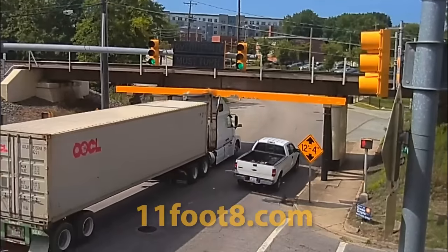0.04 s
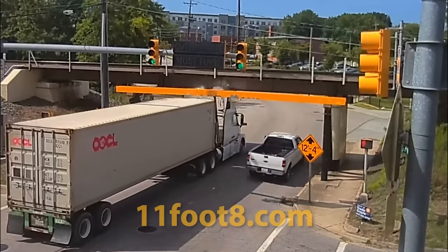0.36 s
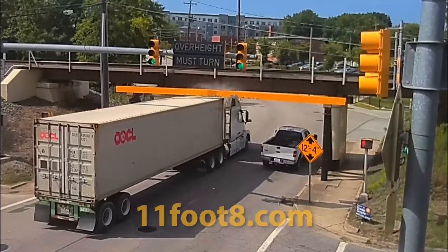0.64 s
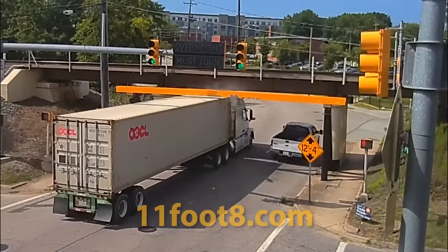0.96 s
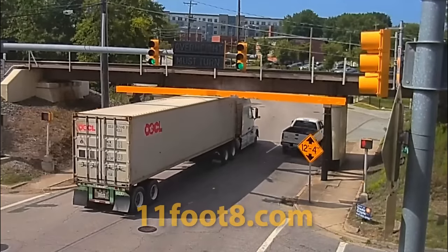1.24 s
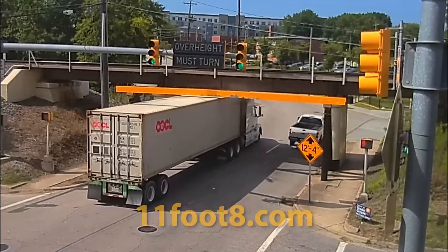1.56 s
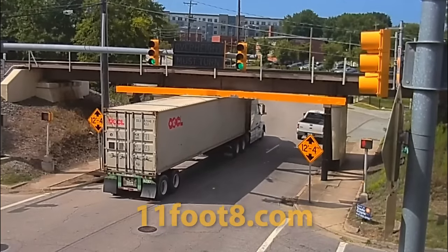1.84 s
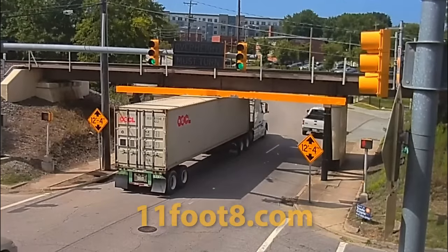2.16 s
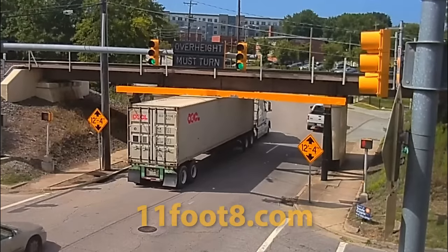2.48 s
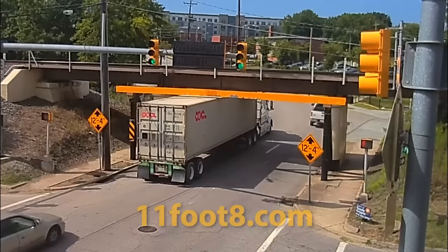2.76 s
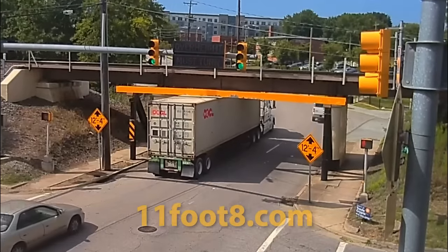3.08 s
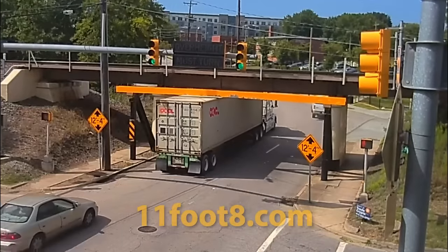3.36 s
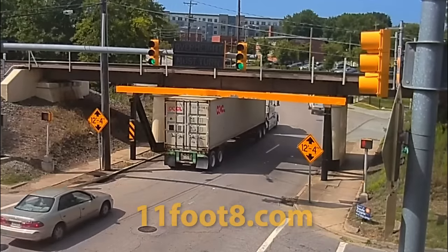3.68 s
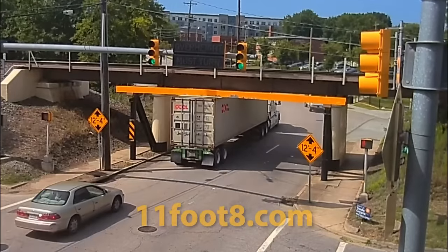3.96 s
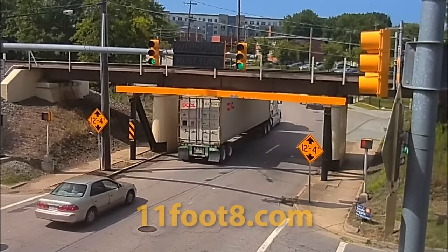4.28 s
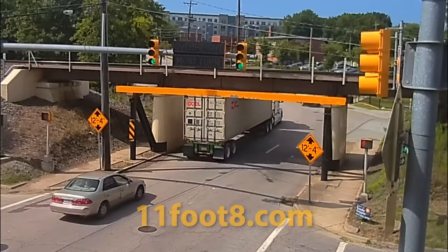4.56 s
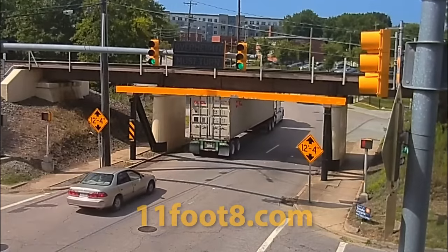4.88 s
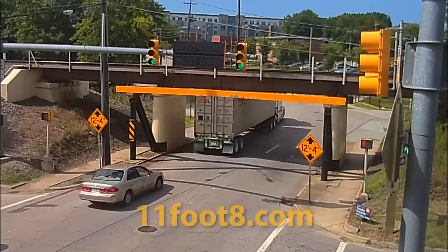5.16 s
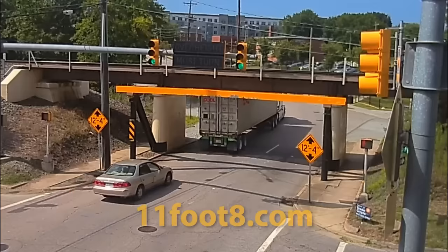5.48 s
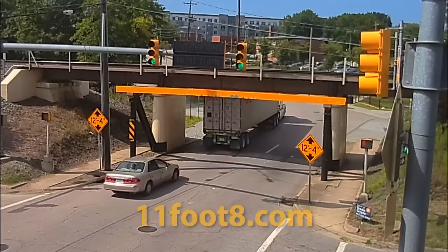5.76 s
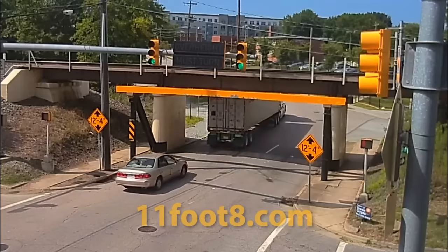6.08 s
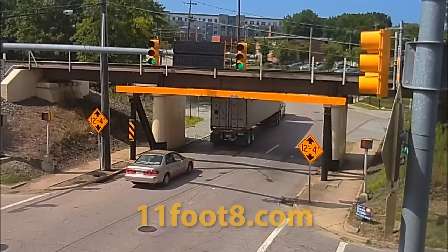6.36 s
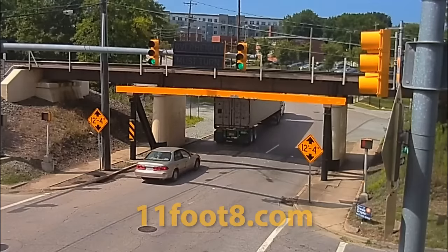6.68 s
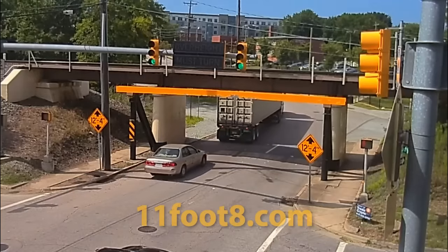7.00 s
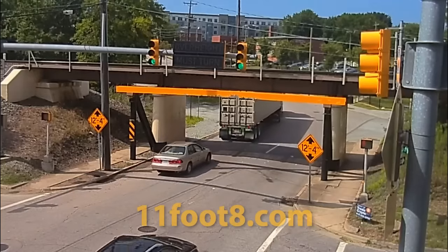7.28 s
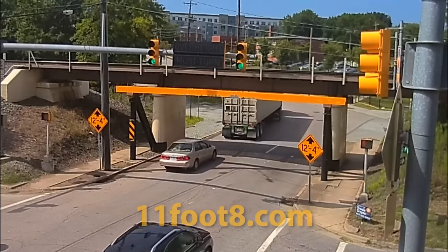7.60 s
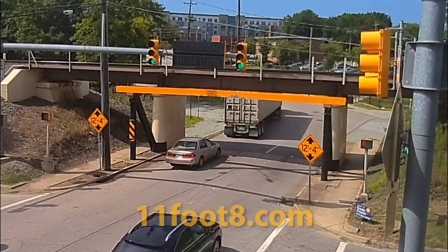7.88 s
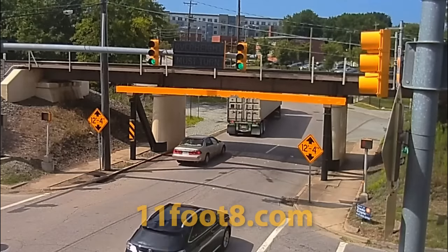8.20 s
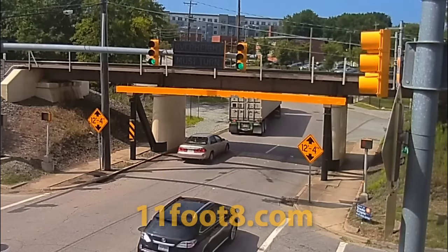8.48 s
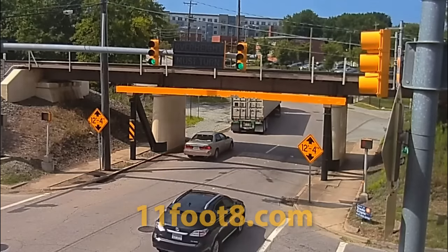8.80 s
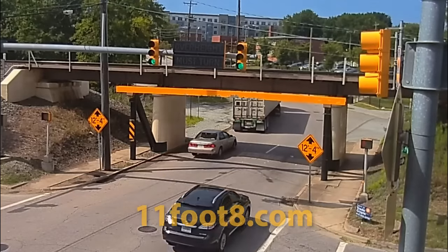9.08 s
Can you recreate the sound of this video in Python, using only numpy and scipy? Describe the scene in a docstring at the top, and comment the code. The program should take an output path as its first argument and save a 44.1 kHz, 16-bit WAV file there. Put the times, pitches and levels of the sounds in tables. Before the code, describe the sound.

Right from the start, a truck's container roof grinds loudly under a steel bridge beam. A harsh, juddering rasp and a hollow boom are strongest in the first half second, with a wavering squeal through the first second. The roof catches again several times between 1 and 2 seconds, with brief shrieks, distorting the small roadside microphone. The scrape then rings away into much quieter traffic: low engine drones and tyre rumble that slowly recede. Loose steel on the trailer clanks and rattles from about 2.2 to 3.2 seconds. A sharper clank comes at 4.7 seconds, a lighter one just after 5, and more rattling around 6 to 6.5 as a car engine swells softly. A bird chirps faintly between 7 and 7.7 seconds and again near 8.7. One small clank sounds at about 9 seconds over the continuing traffic.

```python
"""Lorry scraping under a low bridge

A container roof grinds under a steel guard beam for two seconds: stick-slip friction makes the steel
rasp, squeal and shriek and the hollow box boom, overloading a small roadside camera. The lorry drives
on: engines drone, tyres roll, loose steel on the trailer rattles and clanks, and a bird chirps."""
import sys
import numpy as np
from scipy import signal
from scipy.fft import rfft, irfft, next_fast_len
from scipy.io import wavfile
from scipy.ndimage import uniform_filter1d

SR = 44100
rng = np.random.default_rng(int(sys.argv[2]) if len(sys.argv) > 2 else 0)


def output_pcm(signal):
    """Save a mono or channel-first signal as 16-bit PCM at the path in sys.argv[1].

    Samples are clipped to [-1, 1] before scaling.
    """
    pcm = np.clip(np.atleast_2d(signal).T, -1, 1) * 32767
    wavfile.write(sys.argv[1], SR, np.round(pcm).astype(np.int16))


N = 407484
TIME = np.arange(N) / SR


def undb(db):
    """Decibels to amplitude ratio."""
    return 10 ** (np.asarray(db) / 20)


def unit(x):
    """Normalisation to rms 1."""
    return x / np.sqrt(np.mean(x ** 2))


def decay(t, t60):
    """Exponential damping: 60 dB down after t60 seconds."""
    return np.exp(-np.log(1000) * t / t60)


def colour(x, spectrum, modes=()):
    """Source-filter shaping: a smooth spectral envelope times a set of second-order resonances."""
    size = next_fast_len(len(x) + 8192)
    f = np.maximum(np.fft.rfftfreq(size, 1 / SR), 1)
    hz, db = np.transpose(spectrum)
    envelope = undb(np.interp(np.log(f), np.log(hz), db))
    resonance = 1 + sum(undb(peak_db) / (1 + 1j * (f * f - centre * centre) / (f * width))
                        for centre, width, peak_db in modes)
    return irfft(rfft(x, size) * resonance * envelope, size)[:len(x)]


def noise(spectrum):
    """Filtered Gaussian noise of rms 1."""
    return unit(colour(rng.standard_normal(N), spectrum))


def wander(rate):
    """Smooth random modulation of rms 1, through `rate` new values a second."""
    knots = rng.standard_normal(N // 20)
    path = np.interp(TIME * rate, np.arange(len(knots)), knots)
    return unit(uniform_filter1d(path, max(int(SR / rate / 2), 1)))


def impulses(per_s, spread_db):
    """Shot noise: dense tiny impacts, a few much larger than the rest."""
    size = undb(spread_db * np.minimum(rng.exponential(size=N), 5))
    return (rng.random(N) < per_s / SR) * size * rng.choice([-1, 1], N)


def glides(notes, jitter):
    """Frequency modulation: short tones, each wavering about a parabola through three pitches."""
    out = np.zeros(N)
    waver = 1 + jitter * wander(300)
    for start, length, first, middle, last, db in notes:
        at = np.flatnonzero((TIME >= start) & (TIME < start + length))
        progress = (TIME[at] - start) / length
        hz = np.polyval(np.polyfit([0, .5, 1], [first, middle, last], 2), progress) * waver[at]
        phase = 2 * np.pi * np.cumsum(hz) / SR
        out[at] += undb(db) * np.sqrt(2) * np.sin(np.pi * progress) * np.sin(phase)
    return out


def pushes(rows, release_t60, ring_db, ring_t60):
    """Envelope of forced vibration: each push rises, holds, then decays at two rates; powers add."""
    power, ring = np.zeros(N), undb(ring_db)
    for start, attack, hold, db in rows:
        rise = np.clip((TIME - start) / attack, 0, 1)
        after = np.maximum(TIME - start - attack - hold, 0)
        release = (1 - ring) * decay(after, release_t60) + ring * decay(after, ring_t60)
        power += (undb(db) * rise * release) ** 2
    return np.sqrt(power)


def underpass(x, wet_db, t60=0.54):
    """Reverberation: piers and deck add a short diffuse tail to the direct sound."""
    t = TIME[:SR]
    tail = rng.standard_normal(SR) * decay(t, t60) * (t > .012)
    return x + undb(wet_db) * signal.fftconvolve(x, tail / np.sqrt(np.sum(tail ** 2)))[:N]


def receding(db, fade_db_per_s, swell_db, leaves_s=2.18, under_deck_s=6.6, width_s=1.5):
    """Spreading loss and reflection: the gain falls as traffic draws away and swells under the deck."""
    under_deck = np.exp(-.5 * ((TIME - under_deck_s) / width_s) ** 2)
    return undb(db - fade_db_per_s * np.maximum(TIME - leaves_s, 0) + swell_db * under_deck)


def street():
    """Broadband rolling noise: heavy wheels rumble, treads roar, and grit hisses above them."""
    # spectra of wheels, treads and grit: (frequency [Hz], relative spectral level [dB])
    wheel_spectrum = [(10, -9.5), (22, 1.5), (32, 1.5), (44, -1), (60, -2.5), (80, -6), (105, -6.5),
                      (135, -11.5), (165, -16.5), (205, -14), (260, -22), (600, -38), (3000, -87)]
    tread_spectrum = [(100, -25), (250, -11), (320, 3.5), (390, 1), (470, 2.5), (600, 1.5), (800, -2.5),
                      (990, 3), (1200, -4), (1450, -5.5), (1800, -23.5), (3000, -32), (6000, -39)]
    grit_spectrum = [(500, -5.5), (1400, -0.5), (2200, -1.5), (3300, 0), (4000, 1), (4700, 2), (5500, 3.5),
                     (8000, -34)]
    rumble = noise(wheel_spectrum) * receding(-31.5, fade_db_per_s=0.46, swell_db=0.5)
    treads = noise(tread_spectrum) * receding(-44, fade_db_per_s=0.74, swell_db=0.52)
    treads *= undb(0.52 * wander(9))
    grit = unit(colour(impulses(per_s=14000, spread_db=1.5), grit_spectrum))
    grit *= receding(-43, fade_db_per_s=0.93, swell_db=3.24) * undb(0.55 * wander(18))
    return rumble + treads + grit


def exhaust(course, octave_db, throb_db, fade_s=0.36):
    """Periodic firing, muffled to its fundamental and octave; throb_db makes the level uneven."""
    times, rates, levels = np.transpose(course)
    hz = np.interp(TIME, times, rates) * (1 + .004 * wander(20))
    phase = 2 * np.pi * np.cumsum(hz) / SR
    tone = unit(np.sin(phase) + undb(octave_db) * np.sin(2 * phase))
    fade = np.clip(1 + np.minimum(TIME - times[0], times[-1] - TIME) / fade_s, 0, 1)
    return tone * fade * undb(np.interp(TIME, times, levels) + throb_db * wander(14))


def engines():
    """Superposition of exhaust tones from the lorry and the cars around it."""
    # the course of each engine: (time [s], firing rate [Hz], level [dB])
    lorry = [(0, 103.4, -23), (.9, 108, -30.5), (1.5, 114.1, -46), (2.5, 120.5, -39), (2.8, 128.5, -35),
             (3.7, 127.3, -41), (4.45, 124.6, -38.5), (5.5, 133.1, -51), (8.1, 133.5, -46.5),
             (8.7, 135.7, -45.5), (9.24, 134.3, -47.5)]
    car = [(2.4, 87.1, -41), (2.9, 93.7, -35.5), (4.4, 90.1, -49), (5.5, 97.3, -41.5), (9.24, 97.2, -40)]
    low_drone = [(4.2, 73.5, -41), (4.9, 77.5, -42.5), (5.5, 76, -41.5), (6.1, 73.8, -33.5),
                 (6.55, 72.5, -37.5)]
    pulling_away = [(5.65, 77.9, -52), (5.85, 89.66, -41), (6.15, 107.7, -50)]
    high_hum = [(5.3, 194, -53), (5.6, 196.1, -48.5), (7.8, 193.2, -59)]
    return (exhaust(lorry, octave_db=-27.5, throb_db=1)
            + exhaust(car, octave_db=-19, throb_db=1)
            + exhaust(low_drone, octave_db=-21, throb_db=0)
            + exhaust(pulling_away, octave_db=-30, throb_db=6)
            + exhaust(high_hum, octave_db=-12, throb_db=1.5))


def bird():
    """Frequency-modulated whistles, reverberating under the bridge."""
    # chirps: (time [s], length [s], start [Hz], middle [Hz], end [Hz], relative level [dB])
    chirps = [(6.99, 0.049, 4110, 4314, 4260, -47), (7.018, 0.028, 5170, 4830, 4700, -48),
              (7.065, 0.047, 3460, 3520, 3070, -49), (7.142, 0.029, 4100, 4130, 4100, -47),
              (7.39, .042, 5500, 4900, 4400, -44.5), (7.448, .055, 3490, 3530, 3012, -47),
              (7.513, 0.02, 2650, 2940, 3110, -49), (7.53, 0.03, 4120, 4200, 4200, -51),
              (7.63, 0.049, 2320, 2400, 2630, -52), (8.69, 0.061, 4200, 4000, 3850, -52.5),
              (8.75, .07, 3193, 3187, 3200, -56)]
    return underpass(glides(chirps, jitter=0.014), wet_db=-9) * undb(2.0)


def trailer_strikes(rattles_per_s=14, spread_db=2.5):
    """Impacts of loose steel as (time [s], level [dB]): clanks, equal rebounds and uneven rattles."""
    # single clanks: (time [s], level [dB], rebound delay [s])
    clanks = [(2.205, -33, .004), (2.53, -32.5, .02), (2.64, -35.5, .02), (2.76, -40, 0.011),
              (3.549, -41, 0.0097), (4.7305, -25.5, 0.0032), (4.7704, -33.5, 0.0075), (5.147, -35, 0.017),
              (6.22, -37.5, .02), (9.054, -42, 0.0089)]
    # spells of rattling after the scrape and under the deck: (time [s], length [s], level [dB])
    rattles = [(2.5, 0.68, -38.5), (5.85, .75, -39.5)]
    strikes = [(start + lag, db) for start, db, rebound in clanks for lag in (0, rebound)]
    for start, length, db in rattles:
        chance = rng.random(size=(64, 2))
        for k, (late, force) in enumerate(chance[:int(length * rattles_per_s)]):
            strikes.append((start + (k + late) / rattles_per_s, db + spread_db * (2 * force - 1)))
    return strikes


def trailer_clanks(crack_t60=0.044, tail_t60=0.6, tail_db=-10):
    """Impact excitation: each strike gives a bright crack, then a rattling tail under the bridge."""
    # spectrum of the struck steel: (frequency [Hz], relative spectral level [dB])
    clank_spectrum = [(200, -30), (900, -12), (1600, -4), (2600, 0), (3400, 2), (4500, 5), (5500, 8),
                      (8000, -24)]
    power = np.zeros(N)
    for start_s, db in trailer_strikes():
        start = int(start_s * SR)
        t = TIME[:min(SR, N - start)]
        crack, tail = decay(t, crack_t60), undb(tail_db) * decay(t, tail_t60)
        power[start:start + len(t)] += undb(db) ** 2 * (crack ** 2 + tail ** 2)
    return np.sqrt(power) * noise(clank_spectrum) * undb(1.5 * wander(200))


def steel_shrieks():
    """Friction-induced vibration: brief gliding tones of steel, reverberating under the bridge."""
    # shrieks: (time [s], length [s], start [Hz], middle [Hz], end [Hz], level [dB])
    shrieks = [(.36, 0.094, 624, 663, 626, -18.5), (.697, 0.021, 5010, 4860, 4900, -12.5),
               (1.15, 0.04, 547, 589, 550, -25), (1.77, 0.078, 997, 1058, 1090, -22.5),
               (1.975, 0.041, 957, 923, 905, -24)]
    return underpass(glides(shrieks, jitter=0.024), wet_db=-14)


def roof_squeal(start_hz=1007, sag_hz_per_s=45, jitter=0.02, flutter_db=6.0):
    """Self-excited oscillation: one steel mode locks to the slipping, unsteady in pitch and strength."""
    # spells when the roof edge sticks and slips in tune: (time [s], attack [s], hold [s], level [dB])
    squeals = [(.09, .03, 0.065, -21), (.26, .05, 0.2, -21), (.53, 0.029, 0.24, -18.5),
               (.82, 0.062, 0.037, -25.5), (1.03, 0.026, .01, -24)]
    hz = start_hz - sag_hz_per_s * TIME  # the pitch sinks as the lorry is slowed
    phase = 2 * np.pi * np.cumsum(hz * (1 + jitter * wander(200))) / SR
    tone = unit(np.sin(phase) * undb(flutter_db * wander(110.1)))
    return tone * pushes(squeals, release_t60=0.11, ring_db=-8.5, ring_t60=1.0)


def roof_scrape(judder_db=2.13):
    """Stick-slip friction: the roof catches and tears free, exciting modes of the steel and the box."""
    # catches on the beam: (time [s], attack [s], hold [s], rasp level [dB], boom level [dB])
    catches = [(0, 0.043, 0.023, -30, -22.5), (0.083, 0.067, .34, -7, -9), (0.463, .02, 0.053, -9.5, -22),
               (0.57, 0.039, .11, -19, -11), (1.083, 0.098, 0.11, -16, -10), (1.258, 0.065, .06, -10, -23),
               (1.434, 0.058, 0.09, -11.5, -12), (1.712, 0.084, 0.023, -14.5, -12),
               (1.979, .004, 0.026, -16, -23.5)]
    # spectra of the friction and the hollow box: (frequency [Hz], relative spectral level [dB])
    friction_spectrum = [(60, -3), (200, -6), (600, 3), (1300, -3.5), (2000, -1), (3200, 1), (4600, 5),
                         (5500, 8.5), (8000, -25.5)]
    box_spectrum = [(10, -7), (20, -5.5), (30, 4), (55, 2), (80, -5), (115, -3.5), (170, -13.5),
                    (300, -21.5), (550, -27.5), (900, -49), (3000, -90)]
    # modes of beam and roof, and of the box walls: (frequency [Hz], bandwidth [Hz], gain [dB])
    steel_modes = [(595, 140, -0.5), (1004, 196, 6), (1423, 124, 2), (2740, 56, -24), (3110, 110, -6.5),
                   (3610, 180, -7), (4400, 140, -11)]
    wall_modes = [(214, 11, -7), (390, 42, 6.5), (536, 140, 4)]
    drag = pushes([(*timing, rasp_db) for *timing, rasp_db, _ in catches],
                  release_t60=0.5, ring_db=-16.5, ring_t60=3.06)
    shake = pushes([(*timing, boom_db) for *timing, _, boom_db in catches],
                   release_t60=0.9, ring_db=-11.5, ring_t60=3.5)
    slips = impulses(per_s=12000, spread_db=2.5) * undb(judder_db * wander(60))
    rasp = unit(colour(slips, friction_spectrum, steel_modes))
    boom = colour(rng.standard_normal(N), box_spectrum, wall_modes)
    # the boom's loudness is held steady, so it swells only with the catches
    boom /= np.sqrt(uniform_filter1d(boom ** 2, size=3000))
    return rasp * drag + boom * shake


def scene():
    """Linear superposition of all sources at the roadside, in one channel."""
    collision = roof_scrape() + roof_squeal() + steel_shrieks()
    return (collision + engines() + bird() + street() + trailer_clanks())[None]


def record(dry, ceiling=0.16, hardness=6, grain_db=-12, band_hz=5400, top_hz=15800):
    """Saturation and spectral imaging: the camera clips, and its coarse sampling mirrors the treble."""
    clipped = dry[0] / (1 + (dry[0] / ceiling) ** hardness) ** (1 / hardness)
    # added grainy noise that grows with the loudest peaks
    grain = undb(grain_db) * clipped ** 2 / ceiling * rng.standard_normal(N)
    narrow = signal.fftconvolve(clipped + grain, signal.firwin(129, band_hz, fs=SR), mode="same")
    imaged = np.interp(TIME, TIME[::4], narrow[::4])  # every fourth sample, joined by straight lines
    lowpass = signal.ellip(10, .2, 80, top_hz, fs=SR, output="sos")
    return signal.sosfilt(lowpass, imaged)[None]


dry = scene()
out = record(dry)
output_pcm(out)
```